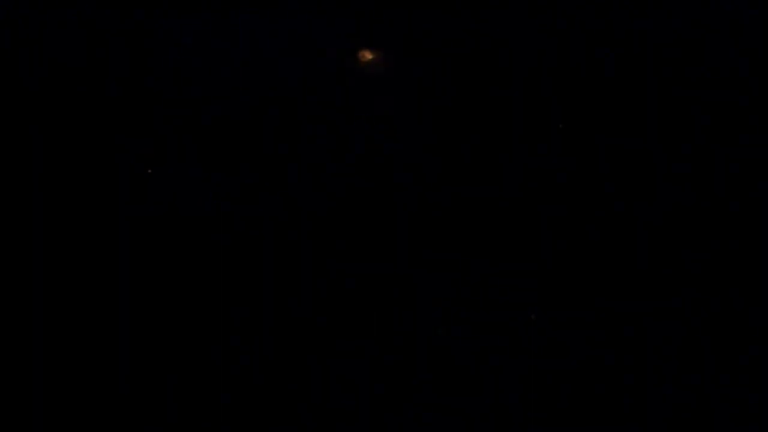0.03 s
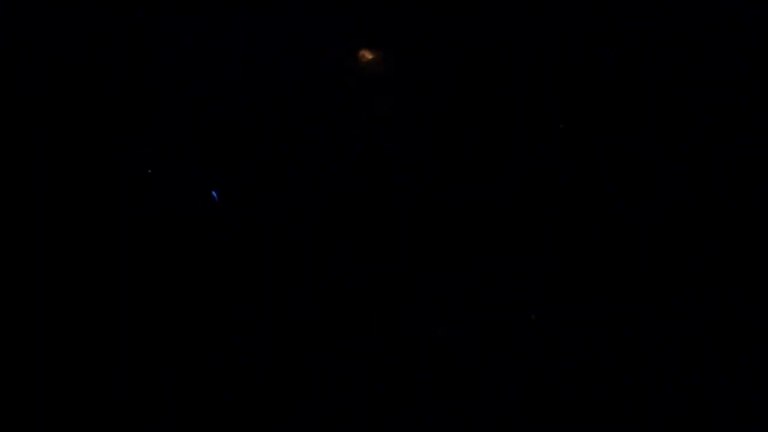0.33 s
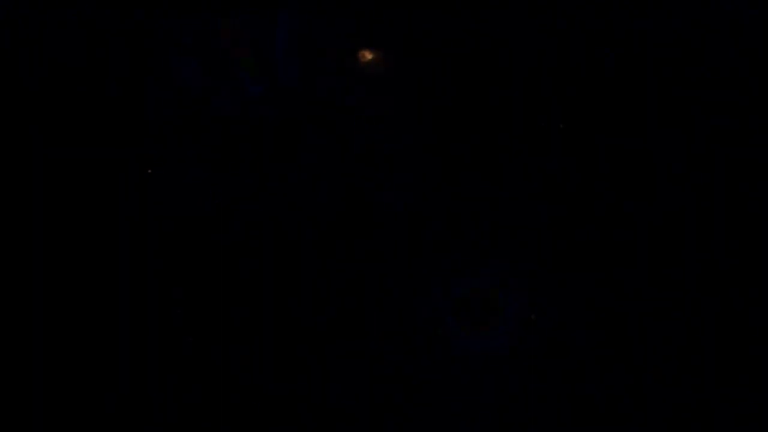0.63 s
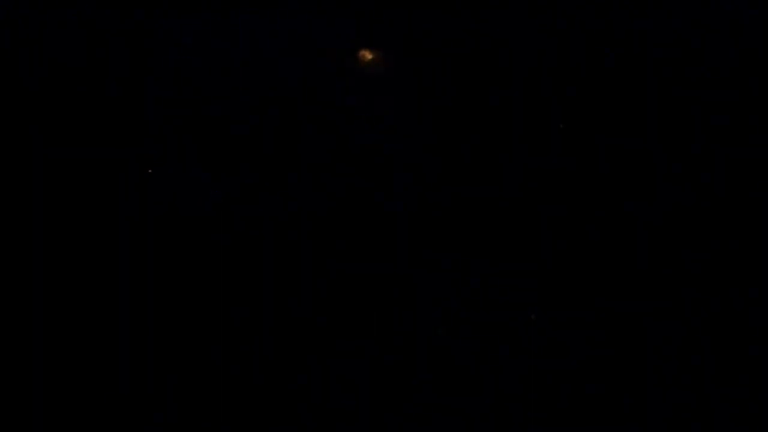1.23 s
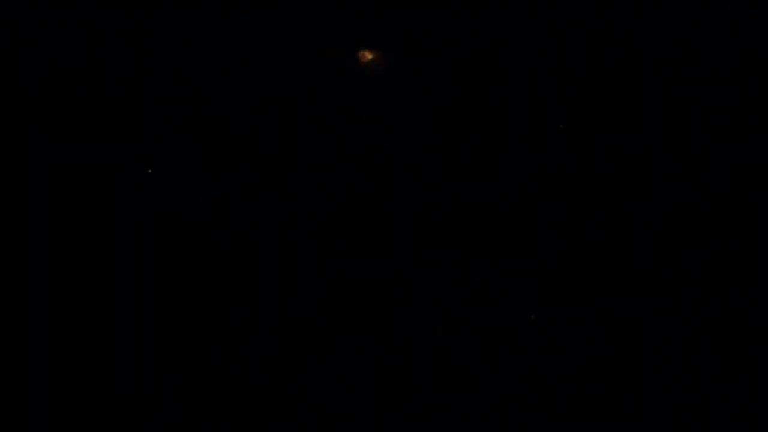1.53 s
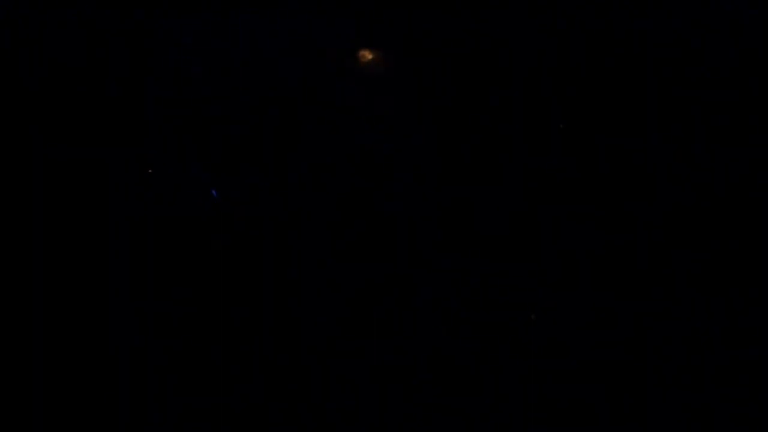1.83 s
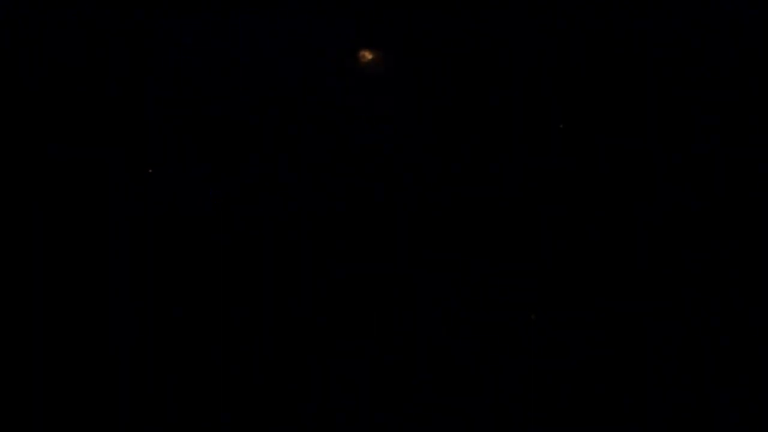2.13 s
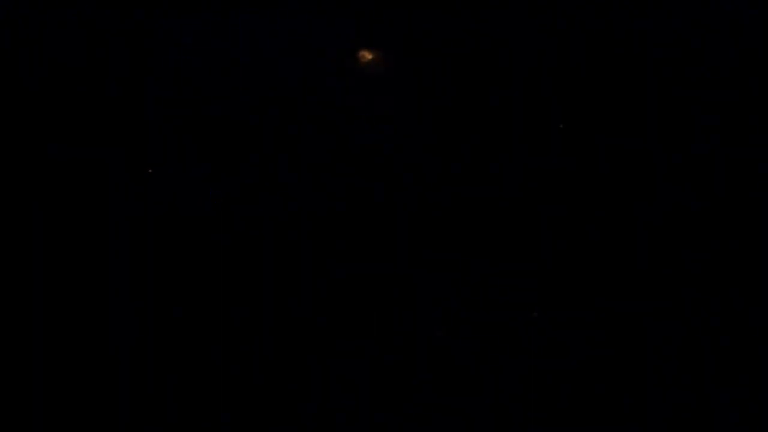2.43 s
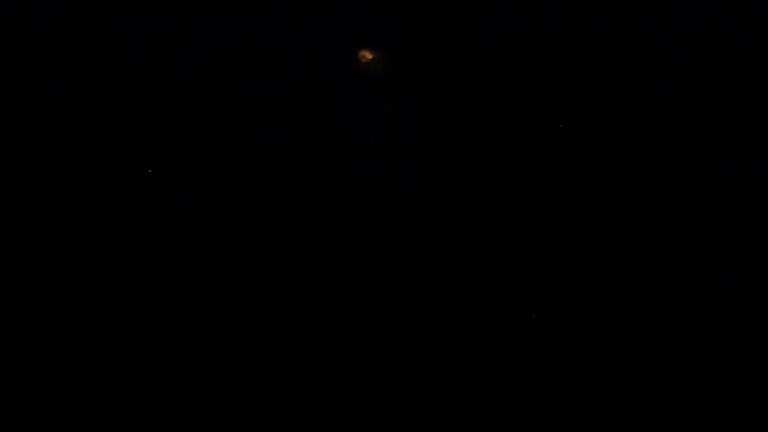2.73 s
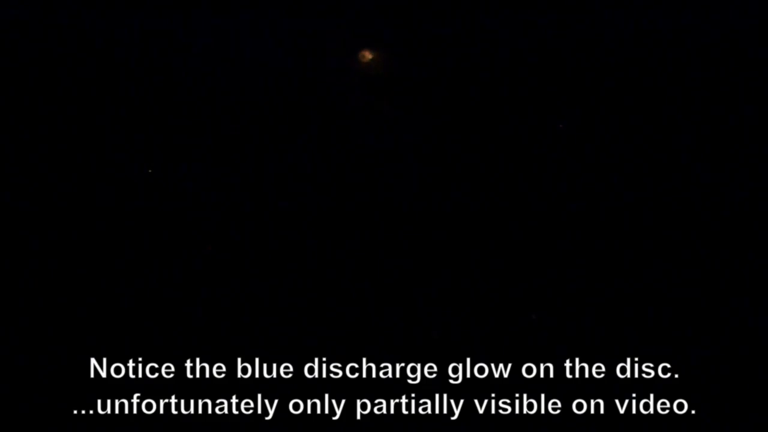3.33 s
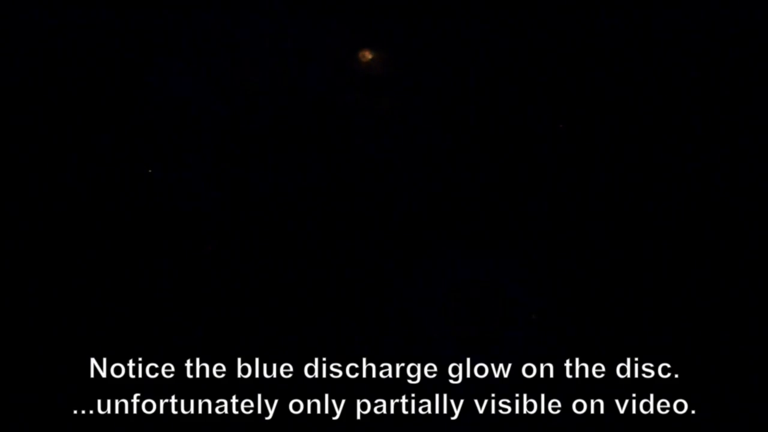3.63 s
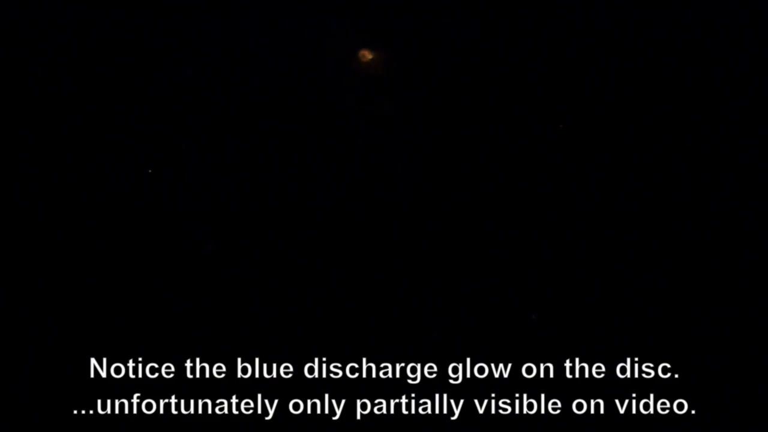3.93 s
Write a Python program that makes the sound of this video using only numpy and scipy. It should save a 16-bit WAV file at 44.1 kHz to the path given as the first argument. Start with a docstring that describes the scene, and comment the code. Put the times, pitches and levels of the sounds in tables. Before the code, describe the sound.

Sharp electric sparks snap from an electrostatic generator at about 0.6, 1.0, 1.5, 1.9, 2.4, 3.0 and 3.6 seconds, each a very short crack with a low pop and slight room echo. From the start, a faint fizzing hiss and the wavering whine of a brushed, spinning disc swell, dropping at every spark. A soft scuff comes near 1.8 seconds. The microphone is close, the room quiet.

```python
"""A quiet room, with a cheap microphone set close to a home-made electrostatic generator.
The disc whines under its brushes and the corona hiss swells as charge builds,
until a spark snaps across the gap and empties it. Each spark also jolts the
microphone circuit into a low pop, and slaps back from a wall."""
import sys
import numpy as np
from scipy import signal
from scipy.fft import rfft, irfft
from scipy.io import wavfile

SR = 44100
rng = np.random.default_rng(int(sys.argv[2]) if len(sys.argv) > 2 else 0)


def wrap_up_sound(samples):
    """Save the sound to the file named by the first command line argument, as 16-bit audio."""
    columns = np.atleast_2d(samples).T
    # keep every value between -1 and 1, then stretch to whole-number steps
    tamed = np.clip(columns, -1, 1)
    steps = np.round(tamed * 32767).astype(np.int16)
    wavfile.write(sys.argv[1], SR, steps)


N = 176400
TIME = np.arange(N) / SR

# Each row: start in seconds; the pop's level in dB, ring in Hz, decay and rise in seconds; spike,
# crack and room send in dB; the hiss just afterwards in dB and its growth in dB per second.
DISCHARGES = [(0.6298, -18, 210, 0.00095, 0.0001, -11, -11, -13.5, -60.5, 17.5),
              (1.0257, -18, 200, 0.00085, 0.00014, -35, -16, -18.5, -63.5, 15.5),
              (1.461, -19.5, 201, 0.00088, 0.0002, -27.5, -19.5, -18, -63.5, 14),
              (1.8837, -21, 205, 0.00088, 0.000088, -42, -18.5, -19, -64, 17),
              (2.3550, -18, 173, 0.0013, 0.00014, -31, -22.5, -13, -64, 15),
              (2.9633, -15.5, 160, 0.0016, 0.00016, -25.5, -18.5, -11.5, -64.5, 16.5),
              (3.5686, -15.5, 167, 0.0016, .00017, -26.5, -16, -11, -64.5, 14.5)]
# The snap's colour at the microphone. Each row: centre in Hz, width in Hz, gain in dB.
SNAP_RESONANCES = [(2490, 280, 4), (2780, 410, -5.5), (3480, 160, -8), (4110, 470, 6.5), (4510, 330, -9),
                   (5040, 530, 4), (5950, 230, -6), (6830, 420, 3), (8950, 440, 0), (11550, 350, -2)]
SAG_SHARE, SAG_RECOVERY_S = 0.19, 0.034  # the circuit's bias sinks and creeps back
SPIKE_S, CRACK_HZ, CRACK_DECAY_S = 0.00008, 7200, 0.00007
SCATTER_DB, ROOM_DB, ROOM_T60_S = -24, -46, 0.17
WALL_S, WALL_DB, BOUNCE_LOSS_DB, WALL_SMEAR_S = 0.0147, -22, 9, 0.00075

def sparks():
    """Close cracks pop the circuit, scatter off the machine, slap off a wall and leave a faint tail."""
    pops, snaps, scatter, room = np.zeros((4, N))
    for start, pop_db, pop_hz, decay_s, rise_s, spike_db, crack_db, send_db, *_ in DISCHARGES:
        phase_per_hz = 2 * np.pi * (TIME - round(start * SR) / SR)
        ring = dying(start, decay_s) * np.cos(pop_hz * phase_per_hz)
        sag = SAG_SHARE * dying(start, SAG_RECOVERY_S)
        pops -= from_db(pop_db) * (ring + sag) * (1 - dying(start, rise_s))
        snaps -= from_db(spike_db) * dying(start + SPIKE_S, SPIKE_S)
        snaps -= 2 * from_db(crack_db) * dying(start, CRACK_DECAY_S) * np.sin(CRACK_HZ * phase_per_hz)
        scatter += from_db(send_db + SCATTER_DB) * dying(start, decay_s=0.003)
        room += from_db(send_db + ROOM_DB) * dying(start + WALL_S, ROOM_T60_S / np.log(1000))
        for bounce in (1, 2, 3):
            slap_db = send_db + WALL_DB - BOUNCE_LOSS_DB * (bounce - 1)
            room += from_db(slap_db) * dying(start + WALL_S * bounce, WALL_SMEAR_S * bounce)
    near = cut(scatter * rng.standard_normal(N), 3240, "high")
    far = cut(room * rng.standard_normal(N), 4200, "high", order=4)
    return resonate(pops + snaps + near, SNAP_RESONANCES) + cut(far, 8600, "low")


FIRST_HISS_DB, FIRST_GROWTH_DB_PER_S = -58.5, 16

def charge_db():
    """The charge, heard as hiss level: already building at the start, it drops at every spark."""
    level_db = FIRST_HISS_DB + FIRST_GROWTH_DB_PER_S * TIME
    for start, *_, after_db, growth in DISCHARGES:
        level_db = np.where(TIME >= start, after_db + growth * (TIME - start), level_db)
    return level_db


# The corona from close by. Each row: frequency in Hz, relative level in dB.
CORONA_SPECTRUM = [(30, -18), (130, -15), (240, -3), (520, -14), (900, -4), (1400, -3.5), (2400, -7),
                   (3400, -4), (5000, -3.5), (6800, 4.5), (7900, -7), (9500, -2.5), (12000, -6),
                   (15000, -1.5)]
# The machine's body, heard in hiss and rubbing. Each row: centre in Hz, width in Hz, gain in dB.
MACHINE_RESONANCES = [(1220, 52, 0.5), (1394, 130, 5), (1745, 60, 4), (1830, 120, -1.5), (2110, 71, 4),
                      (2210, 100, 7), (2400, 130, -2.5), (2533, 33, 7.5), (2694, 40, 2), (2953, 110, 4),
                      (3193, 160, -6), (3840, 98, 8.5), (4060, 240, -2.5), (4504, 145, 6.5),
                      (4784, 245, 6.5), (5300, 320, -2.5), (5570, 250, 3.5), (9180, 450, 4.5),
                      (10460, 170, 1.5), (11250, 240, 5.5), (12150, 200, 9.5)]
GRAINS_PER_S = 3000  # at mean charge
GRAIN_SPREAD_DB, GRAIN_DB, SMOOTH_DB = 3.5, 2, 1

def corona(level_db):
    """Thousands of tiny discharges a second over a smooth hiss, denser and louder as charge builds."""
    fires = rng.random(N) < GRAINS_PER_S * from_db(level_db - level_db.mean()) / SR
    sizes = from_db(GRAIN_SPREAD_DB * np.minimum(rng.exponential(1, N), 5))
    grains = fires * sizes * rng.choice([-1, 1], N)
    grains = rms_one(grains / from_db(level_db / 2))  # density alone adds no loudness
    fizz = from_db(GRAIN_DB) * grains + from_db(SMOOTH_DB) * rng.standard_normal(N)
    hiss = resonate(shaped(fizz, CORONA_SPECTRUM), MACHINE_RESONANCES)
    return from_db(level_db) * fizz.std() * rms_one(hiss)


# The disc, slowed by the charge. Each row: time in seconds, speed in turns per second.
DISC_SPEED = [(0, 28.33), (.2, 28.34), (.62, 27.96), (.8, 27.94), (1.02, 27.7), (1.2, 27.93), (1.46, 27.77),
              (1.75, 27.97), (1.88, 27.84), (2.14, 28.02), (2.35, 27.61), (2.62, 27.92), (2.97, 27.14),
              (3.2, 27.47), (3.57, 26.94), (3.8, 27.54), (4, 27.89)]
# Each row: cycles per turn (rounded when played), then dB at mean charge at each of WHINE_TIMES_S.
WHINE_PARTIALS = [(24, -84, -90, -77.5), (29, -79.5, -81.5, -80.5), (32, -75.5, -76.5, -75.5),
                  (37, -82, -85, -80), (42, -79, -78, -78), (48, -72.5, -84, -72.5), (56, -82, -78, -89),
                  (63.8, -71.5, -70.5, -71.5), (73.3, -78, -78, -71), (79.92, -73, -74, -68),
                  (90.6, -74.5, -73, -84), (137.8, -72.5, -73, -81)]
# The hum of rotation. Each row: frequency in Hz, level in dB.
HUM_PARTIALS = [(36.8, -90), (73.6, -88.5), (92, -85)]
WHINE_TIMES_S = (0.17, 1.67, 2.9)
SPEED_WOBBLE, WHINE_CHARGE_SHARE, FLUTTER_DB = 0.0012, 0.99, 1.57

def disc(level_db):
    """The spinning disc: a wavering whine and rubbing brushes, both louder under charge, and a low hum."""
    speed = np.interp(TIME, *np.transpose(DISC_SPEED)) * (1 + SPEED_WOBBLE * drift(rate_hz=19.2))
    turns = np.cumsum(speed) / SR
    swell_db = level_db - level_db.mean()
    whine = np.zeros(N)
    for cycles, *levels_db in WHINE_PARTIALS:
        partial_db = np.interp(TIME, WHINE_TIMES_S, levels_db) + WHINE_CHARGE_SHARE * swell_db
        partial_db += FLUTTER_DB * drift(rate_hz=24)
        whine += from_db(partial_db) * np.sin(2 * np.pi * (round(cycles) * turns + rng.random()))
    hum = sum(from_db(db) * np.sin(2 * np.pi * (hz * TIME + rng.random())) for hz, db in HUM_PARTIALS)
    return np.sqrt(2) * (whine + hum) + brushes(turns, swell_db)


# The brushes on the disc. Each row: frequency in Hz, relative level in dB.
BRUSH_SPECTRUM = [(30, -30), (140, -26), (280, -2), (550, 1), (850, -3.5), (1400, -2), (2200, -2),
                  (3000, 2), (4000, 1.5), (6000, -9), (9000, -17)]
BRUSH_DB = -63  # at mean charge

def brushes(turns, swell_db):
    """The brushes ride the same rough track on every turn, so they rub in a comb of gliding lines."""
    track = irfft(np.exp(2j * np.pi * rng.random(size=500)), 4096)
    roughness = np.interp(turns, np.arange(len(track)) / len(track), track, period=1)
    rub = resonate(shaped(roughness, BRUSH_SPECTRUM), MACHINE_RESONANCES)
    return from_db(BRUSH_DB + swell_db) * rms_one(rub)


# Each row: start in seconds, level in dB, decay in seconds, top cut in Hz.
SCUFF_EVENTS = [(.455, -65, .04, 170), (1.816, -54, .04, 2300), (2.655, -67, .025, 160)]
# Their colour before the top cut. Each row: frequency in Hz, relative level in dB.
SCUFF_SPECTRUM = [(60, -22), (150, -7), (230, 0), (900, 1), (2200, -1), (4000, -20), (15000, -25)]

def scuffs():
    """The mechanism gives a few soft, dull rubs and bumps."""
    rub = shaped(rng.standard_normal(N), SCUFF_SPECTRUM)
    return sum(from_db(db) * dying(start, decay_s) * rms_one(cut(rub, top_hz, "low"))
               for start, db, decay_s, top_hz in SCUFF_EVENTS)


# The quiet behind the machine. Each row: frequency in Hz, relative level in dB.
ROOM_TONE_SPECTRUM = [(30, 3), (130, -10), (240, 5.5), (600, -1), (2000, -0.5), (8000, -39), (15000, -27)]
ROOM_TONE_DB = -73.5

def room_tone():
    """The room's faint, steady noise."""
    return from_db(ROOM_TONE_DB) * shaped(rng.standard_normal(N), ROOM_TONE_SPECTRUM)


def from_db(db):
    """Decibels to gain."""
    return 10 ** (np.asarray(db) / 20)


def rms_one(x):
    """Scale to rms 1."""
    return x / np.sqrt(np.mean(x ** 2) + 1e-20)


def cut(x, hz, kind, order=2):
    """Butterworth high- or low-pass."""
    return signal.sosfilt(signal.butter(order, hz, kind, fs=SR, output="sos"), x + 1e-18)


def shaped(x, spectrum):
    """Give a noise a smooth spectrum; rms 1."""
    hz, db = np.transpose(spectrum)
    bins_hz = np.maximum(np.arange(N // 2 + 1) * SR / N, 1)
    gain = from_db(np.interp(np.log(bins_hz), np.log(hz), db))
    return rms_one(irfft(rfft(x) * gain, N))


def resonate(x, table):
    """A chain of peaks and notches."""
    for hz, width_hz, db in table:
        gain, half_width = from_db(db / 2), np.pi * width_hz / SR
        tuning = -2 * np.cos(2 * np.pi * hz / SR)
        forward = [1 + half_width * gain, tuning, 1 - half_width * gain]
        feedback = [1 + half_width / gain, tuning, 1 - half_width / gain]
        x = signal.lfilter(forward, feedback, x + 1e-18)
    return x


def drift(rate_hz):
    """Slow random motion of spread 1."""
    return rms_one(cut(rng.standard_normal(N + SR), rate_hz, "low")[SR:])


def dying(start_s, decay_s):
    """An exponential decay that begins at a given time."""
    age = TIME - round(start_s * SR) / SR
    return (age >= 0) * np.exp(-np.clip(age / decay_s, 0, 60))


def scene():
    """The machine up close, over the quiet of the room, in mono."""
    level_db = charge_db()
    return (corona(level_db) + disc(level_db) + sparks() + room_tone() + scuffs())[None]


# The microphone's narrow notch. Each row: centre in Hz, width in Hz, gain in dB.
MICROPHONE_NOTCH = [(4420, 70, -16)]
MIC_TOP_HZ, MIC_LEAK_DB, MIC_BIAS, CUTOFF_HZ = 9600, -33.5, 0.021, 15700

def record(dry):
    """The cheap microphone: dull and notched, with a little treble leak, a steep top cut and a bias."""
    dull = cut(resonate(dry, MICROPHONE_NOTCH), MIC_TOP_HZ, "low", order=6)
    leak = from_db(MIC_LEAK_DB) * dry
    top_cut = signal.ellip(10, 0.1, 70, CUTOFF_HZ, fs=SR, output="sos")
    return MIC_BIAS + signal.sosfilt(top_cut, dull + leak)


dry = scene()
out = record(dry)
wrap_up_sound(out)
```